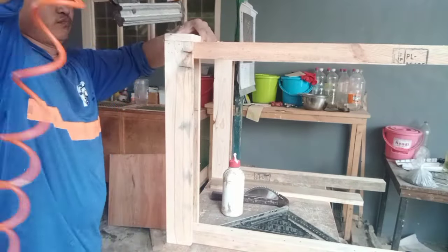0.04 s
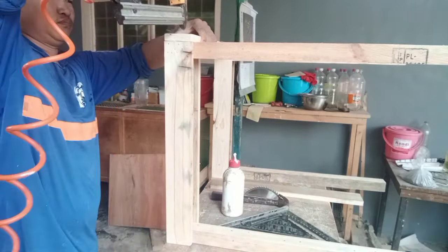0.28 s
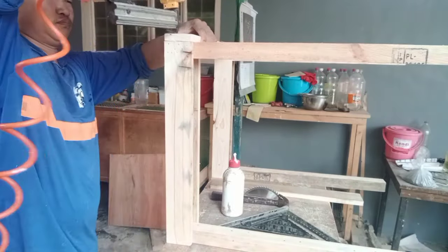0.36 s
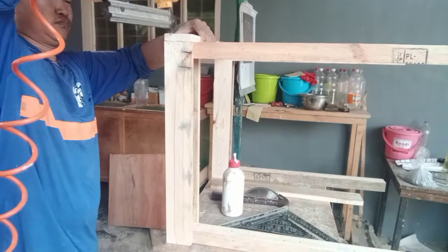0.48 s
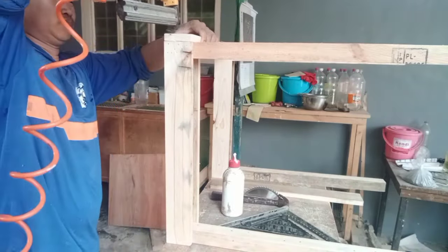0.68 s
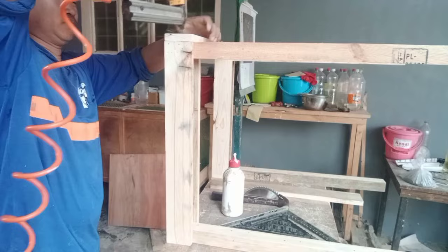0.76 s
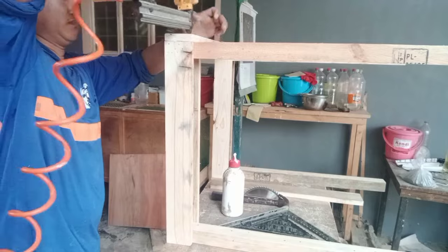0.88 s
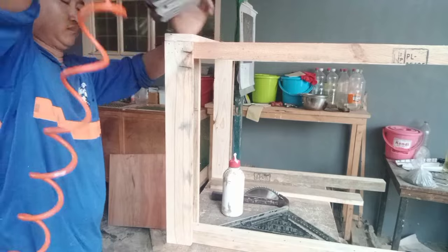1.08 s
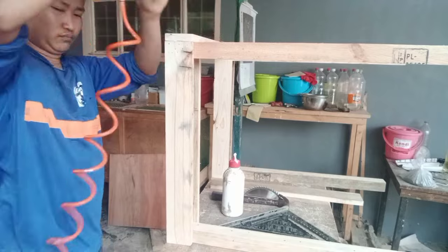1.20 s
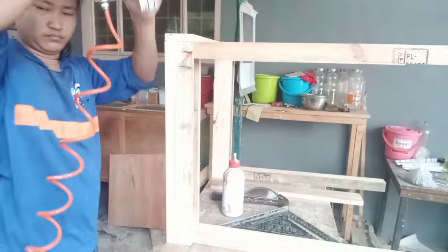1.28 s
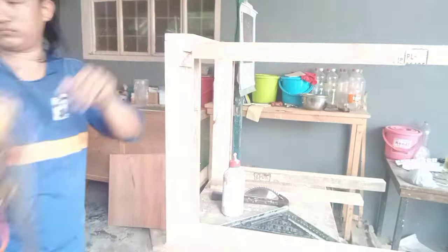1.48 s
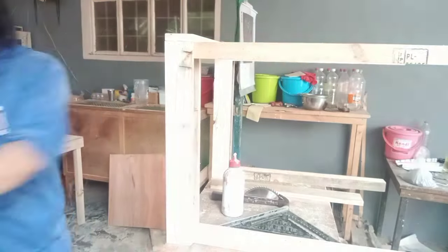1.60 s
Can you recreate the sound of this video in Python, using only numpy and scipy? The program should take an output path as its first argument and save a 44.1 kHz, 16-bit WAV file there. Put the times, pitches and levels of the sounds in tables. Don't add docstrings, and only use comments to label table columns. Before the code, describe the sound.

A pneumatic nail gun, after a faint trigger flick at 0.2 s, fires six nails into a wooden frame from 0.25 to 0.9 s, with loud cracks, woody knocks, a brief plank ring and bursts of spent air. Soft ticks follow around 1.05-1.2 s. The tool scrapes, clacks hard at 1.33 s, rattles and drags on wood. A short rubbery hose squeak comes near 1.57 s over low workshop hum.

```python
import sys
import numpy as np
from scipy import signal
from scipy.fft import rfft, irfft, next_fast_len
from scipy.io import wavfile
from scipy.ndimage import map_coordinates

SR = 44100
rng = np.random.default_rng(int(sys.argv[2]) if len(sys.argv) > 2 else 0)


def volts_from_db(level):
    exponent = np.asarray(level, float) / 20
    return 10 ** exponent


def wav_record(signal):
    frames = np.transpose(np.atleast_2d(signal))
    bounded = np.clip(frames, -1, 1)
    quanta = np.round(bounded * 32767).astype(np.int16)
    wavfile.write(sys.argv[1], SR, quanta)


N = 72765
T = np.arange(N) / SR

# [f/Hz, level/dB]
HUM_COLOUR = [(18, -75.5), (30, -52), (124, 5), (471, -18), (596, -29.5), (775, -47.5), (1120, -37),
              (1420, -18), (15800, -43)]
# [t/s, level/dB]
HUM_LEVEL = [
    (0, -62),
    (0.169, -64.5),
    (.95, -55),
    (1.25, -58.5),
    (1.552, -57.5),
    (1.65, -66.5),
]
# [f/Hz, width/Hz, level/dB]
HUM_RING = [(150, 160, -11), (336, 98, -6), (600, 40, -6.5), (900, 250, -19), (1110, 60, -12.5),
            (1280, 35, -10), (1850, 60, -25), (5640, 400, -35.5), (7400, 400, -33.5)]
# [t/s, level/dB, f/Hz, length/s]
FAR_RINGS = [(.04, -74, 1273, 0.067), (.13, -80, 1267, 0.028), (.99, -56, 1317, 0.032),
             (1.09, -67, 1110, 0.022), (1.12, -67.5, 606, 0.048), (1.16, -69, 1260, 0.056),
             (1.405, -60, 3480, 0.017), (1.30, -41, 1260, 0.017), (1.365, -45, 1280, 0.023),
             (1.445, -56, 1790, .02), (1.405, -63, 5300, .02)]
# [f/Hz, time/s]
ROOM_T60 = [(150, 1), (1250, 0.4), (3000, 0.52), (8000, 0.34), (15000, 0.046)]

SQUEAK_HARMONICS = [-24, 0, -18, -15, -29, -32]
# [t/s, level/dB, rise/s, fall/s]
BRUSHES = [
    (0.1929, -37.5, 0.00023, 0.00041),
    (.195, -54, 0.011, 0.013),
    (1.061, -61, 0.0029, 0.0087),
    (1.150, -60.5, 0.0074, .008),
    (1.224, -58.5, 0.00071, 0.0036),
    (1.566, -59.5, 0.011, 0.012),
]
# [f/Hz, level/dB]
BRUSH_COLOUR = [(180, -33), (300, 5), (974, -10.5), (5030, -16.5), (7300, -22.5), (15800, -59)]
# [t/s, level/dB, f/Hz, time to fall 60 dB/s]
TICKS = [(1.054, -58.5, 2466, 0.048), (1.052, -61, 2840, .04), (1.060, -61, 3050, .05),
         (1.061, -60, 1850, 0.097), (1.108, -64, 2900, .03), (1.222, -69, 5250, .03),
         (1.072, -60, 4800, 0.029), (1.078, -63.5, 5750, 0.082), (1.149, -66, 6800, 0.017),
         (1.221, -63, 5800, .03), (1.221, -51, 1180, 0.028)]

# [t/s, rattle level/dB, ring level/dB, rise/s, fall/s]
PUT_DOWN = [
    (1.265, -51.5, -40.5, 0.008, 0.018),
    (1.287, -35.5, -38, 0.008, 0.016),
    (1.296, -43.5, -43, 0.0046, 0.0098),
    (1.328, -31, -51, 0.0085, 0.0047),
    (1.3305, -22, -29, 0.00058, 0.0047),
    (1.343, -37.5, -37.5, 0.0031, 0.017),
    (1.364, -30.5, -46.5, .0015, 0.0078),
]
# [f/Hz, level/dB]
SCRAPE_COLOUR = [(180, -70.5), (300, -27), (1250, -10), (1500, -14), (2420, -5), (7130, -27),
                 (15800, -45.5)]
RATTLE_COLOUR = [(180, -65.5), (300, -29), (1250, -22), (2820, -13), (3490, -16.5), (8140, -17),
                 (15000, -19), (15800, -44)]
# [f/Hz, width/Hz, level/dB]
HANDLE = [(1282, 29, 15.5), (886, 190, -3), (1690, 170, -6), (2370, 960, -12.5)]
MAGAZINE = [(2750, 290, -22), (3465, 148, 6), (4760, 190, -2.5), (5310, 86, 6.5), (5670, 70, 3.5),
            (6720, 65, 2.5), (5945, 150, -11), (7110, 400, -3), (7380, 54.7, 8.5), (9300, 88, -8),
            (10410, 150, -9), (11030, 149, -17), (12300, 100, -22)]
CLACK_BODY = [(2430, 1300, -7), (3500, 590, 4.5), (5300, 1300, -4), (7050, 900, 2), (10800, 4000, -10)]
# [t/s, level/dB]
DRAG = [
    (1.35, -74),
    (1.385, -48),
    (1.419, -52.5),
    (1.445, -49),
    (1.50, -62),
    (1.54, -74),
]
# [f/Hz, width/Hz, level/dB]
DRAG_BODY = [(800, 200, -7.5), (1260, 140, 4.5), (1490, 190, 4.5), (1750, 110, 2.5), (2300, 300, -14.5)]

# [t/s, level/dB, f/Hz, length/s]
JOLTS = [(.197, -40, 152, 0.011), (.253, -38.5, 151, .014), (.278, -37, 156, .012),
         (0.318, -32, 180, 0.005), (0.394, -32, 145, 0.011), (.401, -33.5, 367, .011),
         (0.447, -33, 104, .012), (0.460, -27, 200, 0.005), (.460, -33, 362, .007), (.522, -36, 153, 0.022),
         (0.567, -38, 96, 0.012), (0.577, -31, 198, 0.009), (.580, -35, 320, .007),
         (0.631, -32.5, 156, 0.013), (.626, -37, 340, .009), (.660, -38.5, 160, .012),
         (0.693, -33, 150, 0.011), (.715, -44, 150, .012), (0.742, -26, 254, 0.0035),
         (.795, -27.5, 150, .006), (0.836, -28, 150, 0.005), (.742, -39.5, 91, 0.0062),
         (0.891, -34, 145.4, 0.012), (1.331, -37.5, 150, 0.0035)]
# [f/Hz, width/Hz, level/dB]
FRAME = [(320, 73, -16), (875, 210, -7), (1026, 72, -4.5), (1243, 75, 1.5), (1377, 500, -9),
         (1883, 140, -7.5), (2157, 60, -4.5), (2440, 200, -9)]
# [t/s, level/dB, rise/s, fall/s]
PLANK = [
    (0.255, -16, 0.0064, .014),
    (0.276, -31, 0.0071, 0.006),
    (.393, -14.5, 0.0018, 0.0072),
    (.455, -23, .004, 0.0033),
    (0.526, -25, .003, .006),
    (.637, -31, .003, .008),
    (0.739, -19.5, .002, .008),
    (0.837, -26.5, 0.00077, 0.0035),
]
# [t/s, crack level/dB, frame knock level/dB]
BLOWS = [
    (0.321, -6, -38),
    (0.3913, -17, -12),
    (0.5246, -29.5, -8),
    (0.5296, -20.5, -26.5),
    (0.7373, -27.5, -10),
    (0.7411, -10.5, -10),
    (0.8342, -30, -6),
    (0.8369, -37.5, -13),
    (0.8407, -28.5, -14.5),
    (.794, -17.5, -11),
]
# [f/Hz, level/dB]
CRACK_COLOUR = [(180, -29.5), (1290, -8.5), (4000, -13.5), (7130, -1), (8140, -15), (15800, -23.5)]
# [t/s, air level/dB, frame ring level/dB, rise/s, fall/s]
DRIVES = [
    (.252, -22, -24, 0.0083, 0.019),
    (.392, -14.5, -15, 0.0053, 0.0026),
    (.507, -27, -36, 0.0027, 0.015),
    (.514, -26, -27.5, 0.0045, 0.012),
    (.527, -29, -22, 0.0022, 0.0031),
    (.636, -14, -17, 0.0028, 0.0046),
    (.7372, -27.5, -16.5, 0.00093, 0.0059),
    (.7408, -18.5, -20, 0.0011, 0.0021),
    (.8335, -22.5, -21, 0.00022, 0.006),
    (.838, -18, -21.5, 0.0032, 0.0045),
]
# [t/s, air level/dB, frame ring level/dB, rise/s, fall/s]
PUFFS = [(.311, -19.5, -24.5, 0.006, 0.011), (.321, -22.5, -40.5, .003, 0.013),
         (.448, -20, -27.5, .005, 0.0035), (.457, -14.5, -23.5, 0.003, 0.01),
         (.565, -20, -35, .006, 0.0072), (.575, -18.5, -26, 0.004, 0.013), (.780, -25, -27.5, .004, 0.014),
         (.874, -24, -33, 0.0041, 0.0075), (.695, -15, -25.5, 0.011, 0.0089),
         (.792, -19, -34, 0.005, 0.012), (.8845, -17.5, -28, 0.0011, 0.0051),
         (.890, -18, -36.5, .003, .012)]
# [f/Hz, level/dB]
DRIVE_AIR = [(180, -39.5), (300, -10.5), (592, -26.5), (1250, -22.5), (1520, -13.5), (6780, -10),
             (8140, -16.5), (15800, -21.5)]
PUFF_AIR = [(180, -21.5), (300, -23), (1290, -7.5), (1920, -8.5), (7130, -3), (8140, -8), (11200, -7),
            (15800, -8.5)]
# [f/Hz, width/Hz, level/dB]
PORT_NOTCHES = [(8170, 420, -7), (13650, 1200, -4)]


def unit(x):
    return x / np.sqrt(np.mean(x ** 2) + 1e-20)


def along(points, hz):
    f, v = np.transpose(points)
    return np.interp(np.log(hz + 1), np.log(f + 1), v)


def filtered(x, response):
    m = next_fast_len(N + SR // 2)
    return irfft(rfft(x, m) * response(np.fft.rfftfreq(m, 1 / SR)), m)[:N]


def body(peaks):
    def response(f):
        total = 0
        for k, (centre, width, db) in enumerate(peaks):
            damping = 1j * f * width
            total = total + (-1) ** k * volts_from_db(db) * damping / (centre ** 2 - f ** 2 + damping)
        return total
    return response


def noise(colour):
    return unit(filtered(rng.standard_normal(N), lambda hz: volts_from_db(along(colour, hz))))


def wobble(rate):
    knots = rng.standard_normal(int(N * rate / SR) + 4)
    return map_coordinates(knots, [T * rate])


def swell(s, rise, fall):
    growing = -(np.abs(T - s) / rise) ** 1.35
    return np.exp(np.where(T < s, growing, (s - T) / fall))


def swells(rows):
    return sum(volts_from_db(db) * swell(s, rise, fall) for s, db, rise, fall in rows)


def shaken(envelope, peaks):
    white = rng.standard_normal(N)
    return filtered(envelope * white, body(peaks)) / np.std(filtered(white, body(peaks)))


def bursts(rows, colour, peaks, rough_db):
    lumps = volts_from_db(rough_db * wobble(700))
    hiss = swells([(s, air_db, rise, fall) for s, air_db, _, rise, fall in rows])
    ring = swells([(s, ring_db, rise, fall) for s, _, ring_db, rise, fall in rows])
    return lumps * hiss * noise(colour) + shaken(lumps * ring, peaks)


def swings(rows):
    total = np.zeros(N)
    for s, db, hz, length in rows:
        total += volts_from_db(db) * np.exp(-((T - s) / length) ** 2) * np.cos(2 * np.pi * hz * (T - s))
    return total


def room(x, db, end_s):
    out = x.copy()
    step = SR // 10
    for start in range(0, N, step):
        hz, t, z = signal.stft(rng.standard_normal(SR // 2), SR, nperseg=256)
        fade_db = -60 * t / along(ROOM_T60, hz)[:, None]
        gate_db = -20 * (t / end_s) ** 4
        tail = signal.istft(z * volts_from_db(fade_db + gate_db), SR, nperseg=256)[1]
        wet = signal.fftconvolve(x[start:start + step], tail / np.linalg.norm(tail))[:N - start]
        out[start:start + len(wet)] += volts_from_db(db) * wet
    return out


def hum():
    s, db = np.transpose(HUM_LEVEL)
    rings = shaken(volts_from_db(1.6 * wobble(35)), HUM_RING)
    murmur = volts_from_db(-4 + 1.5 * wobble(12)) * noise(HUM_COLOUR)
    return volts_from_db(np.interp(T, s, db)) * (murmur + volts_from_db(-3.5) * rings)


def far_rings():
    return volts_from_db(2.6 * wobble(90)) * swings(FAR_RINGS)


def squeak():
    s, length = 1.571, .0125
    sag = .004 * (T - s) / length
    turn = 2 * np.pi * np.cumsum(568 * (1 - sag + 0.0035 * wobble(340))) / SR
    stack = np.zeros(N)
    for k, db in enumerate(SQUEAK_HARMONICS):
        level = volts_from_db(db + (1.0 + k) * wobble(240))
        shape = np.exp(-((T - s + 0.00067 * k) / length) ** 4)
        stack += level * shape * np.sin((k + 1) * turn)
    fray = shaken(volts_from_db(-13.5) * swell(s + 0.0059, 0.014, 0.013), DRAG_BODY)
    whine = volts_from_db(-42.5) * swell(1.558, 0.021, 0.019) * np.sin(2 * np.pi * 1220 * T)
    return volts_from_db(-41) * (stack + fray) + whine


def handling():
    brushes = swells(BRUSHES) * noise(BRUSH_COLOUR)
    leak = shaken(volts_from_db(-69.5) * swell(1.557, 0.032, 0.032), [(7400, 91, 0)])
    ticks = np.zeros(N)
    for s, db, hz, t60 in TICKS:
        ticks += volts_from_db(db) * swell(s, 0.00083, t60 / np.log(1000)) * np.sin(2 * np.pi * hz * (T - s))
    return brushes + leak + ticks


def drag_strength():
    s, db = np.transpose(DRAG)
    level = np.interp(T, s, db, left=-120, right=-120)
    return volts_from_db(level + 2.4 * wobble(220))


def clack():
    click = np.zeros(N)
    click[round(1.3306 * SR)] = 1
    click = filtered(click, body(CLACK_BODY))
    return -volts_from_db(-4) * click / np.abs(click).max()


def magazine():
    ring_fall = 0.13 / np.log(1000)
    shake = np.zeros(N)
    for s, rattle_db, _, rise, fall in PUT_DOWN:
        shake += volts_from_db(rattle_db) * (swell(s, rise, fall) + volts_from_db(-25) * swell(s, rise, ring_fall))
    return volts_from_db(0.5) * shaken(shake, MAGAZINE)


def put_down():
    rub = drag_strength()
    scrape = bursts(PUT_DOWN[:3], SCRAPE_COLOUR, HANDLE, rough_db=3.0)
    rattle = bursts(PUT_DOWN[3:], RATTLE_COLOUR, HANDLE, rough_db=-2.0)
    return scrape + rattle + magazine() + clack() + shaken(rub, DRAG_BODY)


def knocks():
    blows = np.zeros(N)
    for s, _, db in BLOWS:
        blows[round(s * SR)] = -volts_from_db(db + 30.0)
    return filtered(blows, body([(hz, 2.5 * width, db) for hz, width, db in FRAME]))


def plank():
    turn = 2 * np.pi * np.cumsum(1250 * (1 + .035 * wobble(120))) / SR
    return swells(PLANK) * np.sin(turn)


def nailer():
    crack = swells([(s, db, .0001, 0.00041) for s, db, _ in BLOWS]) * noise(CRACK_COLOUR)
    drives = bursts(DRIVES, DRIVE_AIR, FRAME, rough_db=3.0)
    puffs = bursts(PUFFS, PUFF_AIR, FRAME, rough_db=0.5)
    return drives + puffs + crack


def wall_echo():
    late = np.roll(nailer(), round(.024 * SR))
    return volts_from_db(-11) * filtered(late, lambda f: 1 / (1 + (f / 9000) ** 2))


def scene():
    tail_s = 0.074
    gun = room(nailer() + wall_echo(), -6, tail_s)
    frame = room(knocks() + plank(), -13, tail_s) + room(swings(JOLTS), -17, tail_s)
    tool = room(put_down(), -18, 0.04)
    return (gun + frame + tool + handling() + squeak() + hum() + far_rings())[None]


def port(f):
    return volts_from_db(sum(db * np.exp(-((f - centre) / width) ** 2) for centre, width, db in PORT_NOTCHES))


def band(f):
    low_cut = (f / 60) ** 2 / (1 + (f / 60) ** 2)
    return low_cut * (1 - np.tanh((f - 15650) / 120)) / 2


def band_limit(x):
    return signal.sosfilt(signal.butter(12, 16010, fs=SR, output="sos"), x)


def record(dry):
    x = filtered(dry[0], port)
    ceiling, knee = .6, 4
    x = x / (1 + np.abs(x / ceiling) ** knee) ** (1 / knee)
    return band_limit(filtered(x, band)[None])


dry = scene()
out = record(dry)
wav_record(out)
```